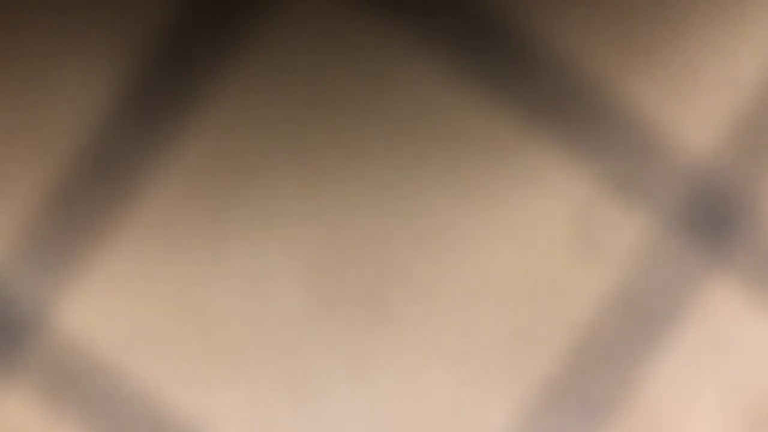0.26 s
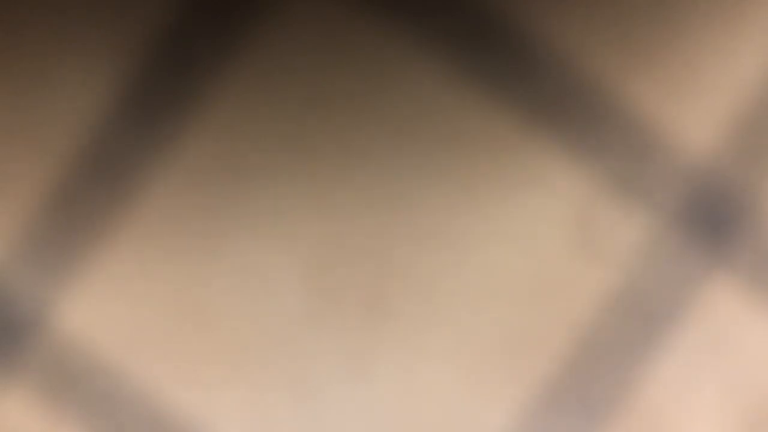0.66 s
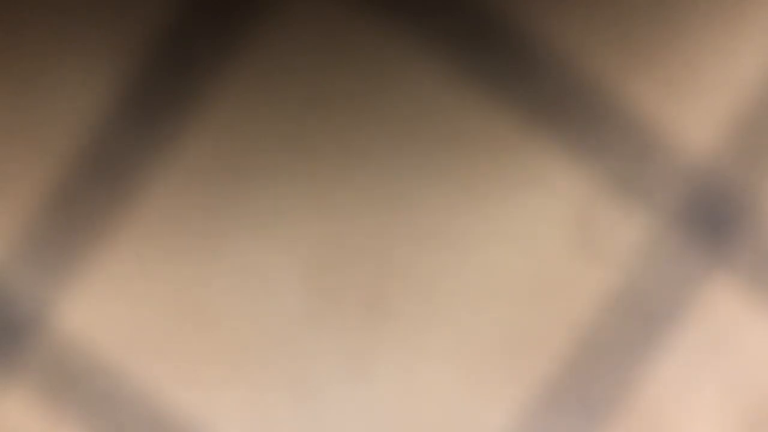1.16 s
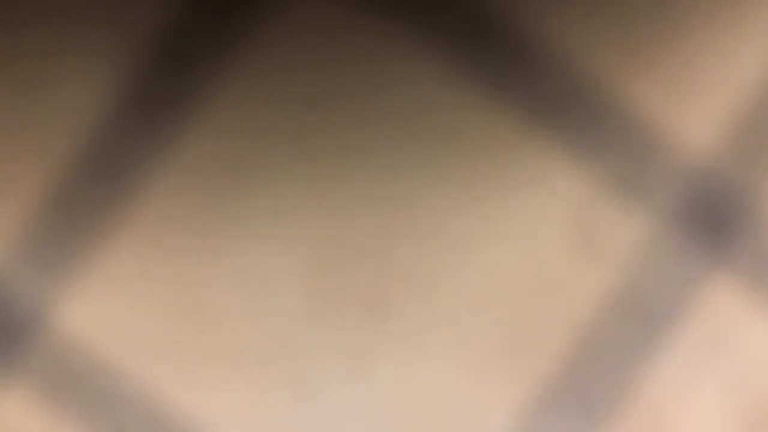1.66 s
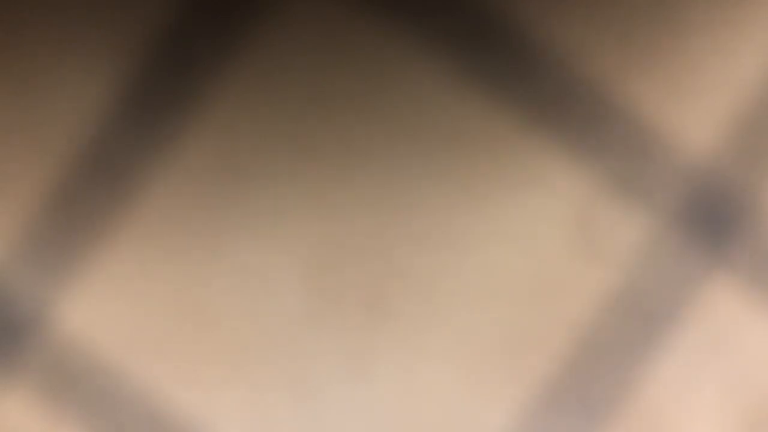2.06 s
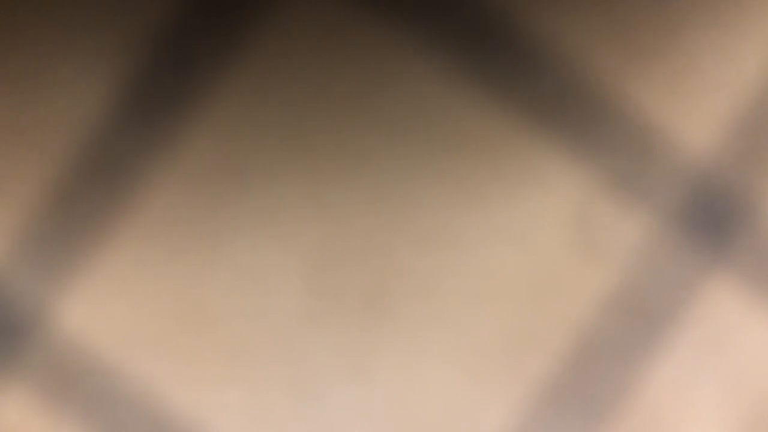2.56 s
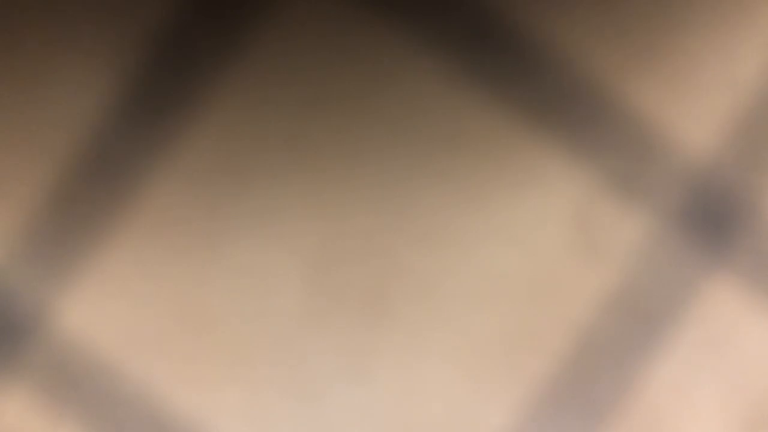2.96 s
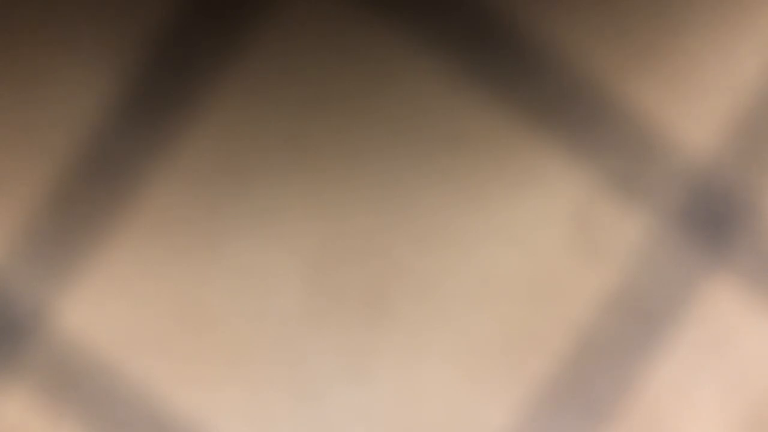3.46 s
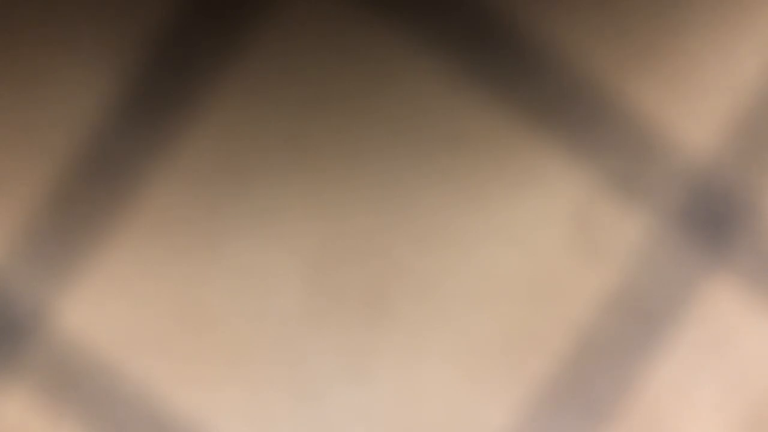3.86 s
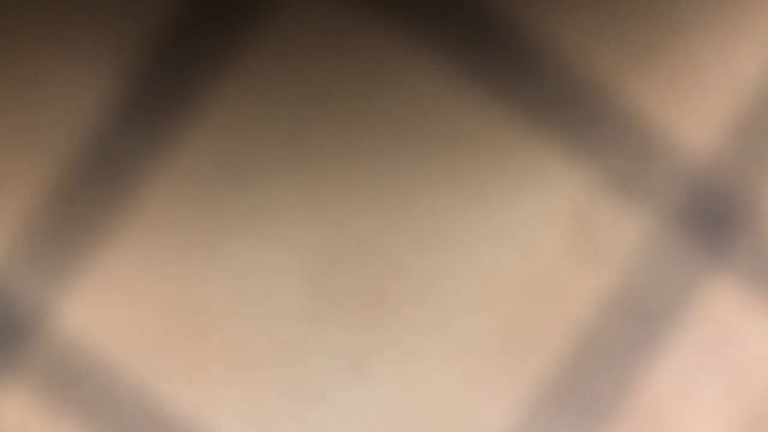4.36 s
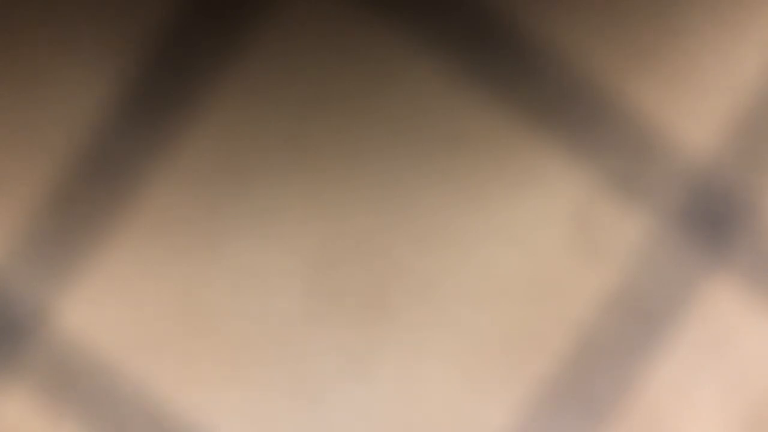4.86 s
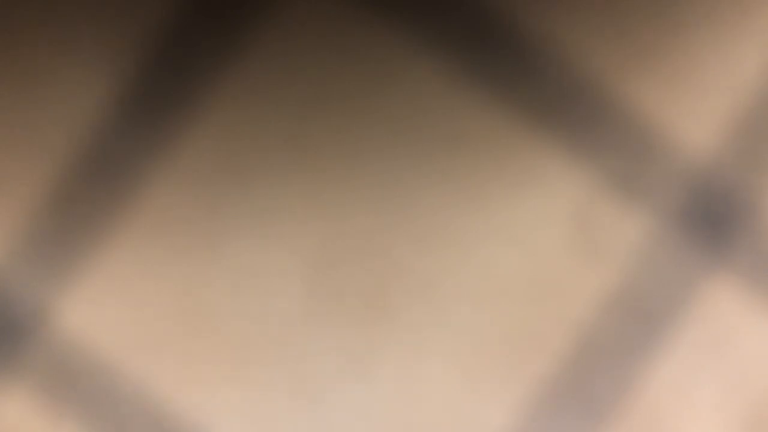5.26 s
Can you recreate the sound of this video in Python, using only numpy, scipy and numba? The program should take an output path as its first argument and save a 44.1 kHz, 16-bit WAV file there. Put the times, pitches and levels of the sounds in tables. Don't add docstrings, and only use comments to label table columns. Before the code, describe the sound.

Close, dry mono pickup in a quiet workshop. Small clicks and a sharp wooden knock lead into a long tearing hand-plane stroke, woody and hissy with thin whistles. A rounder knock ends it; after faint rustling and a medium clack, a second, brighter stroke rips along the wood, then slides off into small scrapes, ticks and shuffles.

```python
import sys
import numpy as np
from scipy import signal
from scipy.fft import rfft, irfft
from scipy.io import wavfile
from scipy.ndimage import uniform_filter1d, map_coordinates
from numba import njit

SR = 44100
rng = np.random.default_rng(int(sys.argv[2]) if len(sys.argv) > 2 else 0)


def gain_from_db(level_db):
    decades = np.asarray(level_db, float) / 20
    return 10 ** decades


def materialize(psi):
    bounded = np.clip(np.atleast_2d(psi).T, -1, 1)
    quanta = np.round(bounded * 32767).astype(np.int16)
    wavfile.write(sys.argv[1], SR, quanta)


N = 243779
T = np.arange(N) / SR

# (pitch [Hz], width [Hz], level [dB])
BENCH_MODES = [(92.9, 26, 5), (52.3, 6.3, -16), (131, 59, -14), (196, 9.3, -19)]
# (pitch [Hz], width [Hz], level [dB])
STRIP_MODES = [(255, 28.4, 4), (382.2, 45, -4), (453.4, 65, -3.5), (585, 40.3, -3.5), (746, 72, 0.5),
               (910, 37, -4), (1066, 72, -3)]
# (pitch [Hz], width [Hz], level [dB])
PLANE_MODES = [(1373, 170, -2.5), (1563, 41, -8), (1720, 170, -0.5), (2070, 160, -7.5), (2400, 305, -2),
               (2720, 190, -5.5), (1200, 200, 0.5), (3194, 540, -10)]
# (frequency [Hz], level [dB per Hz])
SHAVING_COLOUR = [(1710, -39), (2900, -11), (3200, -12.5), (4540, -2), (5230, -4.5), (5930, -10),
                  (6680, -10), (7370, -12.5), (8130, -10.5), (10700, -12.5), (12000, -10.5), (13800, -10.5),
                  (15500, -19)]
# (time [s], downward pressure [dB], bite of the blade [dB], where the strip rings best [Hz])
STROKES = [
    [(.57, -58.5, -65.5, 302), (.74, -59.5, -59, 382), (.886, -43, -44, 370), (1.0, -43.5, -50.5, 460),
     (1.4, -36.5, -39, 416), (1.58, -40, -44, 580), (1.65, -39.5, -50, 428), (1.73, -42, -43.5, 530),
     (2.08, -39.5, -46, 468)],
    [(3.15, -62, -60, 400), (3.29, -49, -51, 454), (3.4, -40, -51.5, 330), (3.55, -38, -44, 715),
     (3.82, -38, -38.5, 454), (4.0, -38.5, -39.5, 740), (4.2, -38, -42, 640), (4.27, -37.5, -40.5, 480),
     (4.37, -47.5, -56, 467)],
]
# (time [s], pressure [dB], bite [dB], strip focus [Hz])
RUN_OUT_PATH = [
    (4.36, -52, -52, 466),
    (4.5, -43.5, -49.5, 450),
    (4.56, -48.5, -57, 410),
    (4.645, -48, -56.5, 240),
]
# (time [s], held [s], level [dB], brightness [dB], strip focus [Hz])
SET_DOWN_SKIDS = [(.05, 0.018, -60, -9.5, 240), (.153, 0.011, -60.5, -8, 380),
                  (0.332, 0.028, -39.5, -22, 327.6), (0.413, 0.044, -43, -9.5, 260),
                  (.46, 0.081, -41, -18, 299), (2.815, 0.035, -68, 10.5, 467),
                  (2.85, 0.024, -51.5, -6.5, 655), (2.891, 0.054, -53, -6.5, 700),
                  (3.034, 0.012, -47, -11, 255), (3.05, .03, -58.5, -11, 260),
                  (2.76, 0.018, -83.5, 10, 502), (5.09, 0.055, -59, -11, 602)]
# (time [s], held [s], level [dB], brightness [dB], strip focus [Hz])
BRUSHING_DRAGS = [(2.029, 0.018, -36.5, -9, 486), (2.1, 0.047, -44.5, -7.5, 395),
                  (2.2, 0.021, -48, -9.5, 333), (2.24, 0.024, -44, -10, 495), (2.4, 0.12, -67.5, -5, 448),
                  (2.555, 0.021, -65, -4.5, 410), (2.62, 0.1, -69, -3.5, 423),
                  (3.09, 0.016, -69, -2.5, 300), (4.66, 0.075, -56.5, -10.5, 280),
                  (4.76, 0.078, -64.5, -0.5, 314), (4.899, 0.048, -54, -1.5, 880),
                  (4.99, 0.045, -65.5, -0.5, 504), (5.091, 0.04, -49.5, -6, 580),
                  (5.17, 0.038, -58, -0.5, 500), (5.24, 0.033, -57.5, 3.5, 700),
                  (5.29, 0.041, -55, -2.5, 810), (5.37, 0.042, -55, -1.5, 317)]
# (bench under strip [dB], hiss over body [dB], top treble [dB], dull rubbing [dB])
CUT_KIND = (-13, -2.5, 0.66, -14.5)
SKID_KIND = (-7.5, -4.5, 4, -9)
DRAG_KIND = (-13, -14.5, -2.5, -7.5)
RUN_OUT_KIND = (-16, -5.5, 5.5, -11.5)
# (middle [s], length [s], level [dB])
BENCH_ROCKS = [(0.904, 0.076, -51), (1.21, 0.23, -38), (1.34, 0.19, -34), (1.463, 0.19, -41.5),
               (1.645, 0.13, -39), (1.757, 0.15, -39.5), (1.999, 0.46, -44), (3.382, 0.16, -43.5),
               (3.69, 0.12, -43), (3.836, 0.25, -38), (4.1, 0.18, -46), (4.22, 0.4, -43.5),
               (4.414, 0.06, -45.5), (4.669, 0.033, -40.5), (5.153, 0.075, -51), (5.4, 0.083, -51.5)]
# (time [s], length [s], from [Hz], to [Hz], level [dB])
SOLE_SQUEAKS = [(1, 0.026, 1590, 1400, -39.5), (1.24, 0.098, 3000, 1700, -39.5),
                (1.462, 0.16, 1014, 1023, -41), (2.029, 0.03, 2500, 2900, -38),
                (3.295, 0.105, 1600, 1318, -42.5), (3.7, 0.038, 2204, 2140, -38),
                (3.79, 0.104, 1900, 1760, -35.5), (3.93, 0.12, 710, 2100, -41.5),
                (4.028, 0.067, 1500, 1700, -43), (5.29, 0.043, 1200, 1000, -52),
                (5.076, 0.091, 1650, 1720, -49.5), (5.088, .045, 1150, 1080, -47),
                (5.095, 0.042, 200, 298, -51), (5.375, 0.0485, 1850, 1400, -56.5),
                (5.36, 0.071, 272, 200, -55.5), (5.25, 0.038, 2000, 2050, -62),
                (.07, 0.024, 1000, 1000, -64), (3.018, 0.034, 2800, 710, -55), (2.93, 0.093, 178, 137, -52),
                (3.8, .06, 200, 122, -53), (.3, 0.024, 1900, 1500, -46), (.456, 0.025, 3000, 2600, -39.5)]
# (time [s], length [s], from [Hz], to [Hz], level [dB])
MOUTH_WHISTLES = [(0.602, 0.43, 13900, 15000, -68), (0.788, .45, 4530, 4110, -49.5),
                  (0.821, 0.3, 8070, 9450, -57), (3.13, 0.15, 8000, 8600, -62),
                  (3.131, 0.12, 10900, 12700, -59), (3.132, .14, 14300, 14700, -62),
                  (3.271, 0.16, 4420, 4510, -51.5), (3.3, 0.35, 13700, 13600, -61),
                  (3.352, 0.23, 8500, 9100, -52), (3.389, 0.27, 5130, 4240, -45.5),
                  (.76, 0.14, 5330, 5650, -58), (0.979, 0.4, 4460, 4200, -46.5),
                  (1.27, .17, 5220, 4700, -47), (1.303, 0.13, 11840, 12200, -52),
                  (1.332, 0.094, 8420, 8700, -54), (1.458, 0.18, 4400, 4160, -50),
                  (1.742, 0.26, 4450, 4830, -51), (1.775, 0.25, 7870, 8700, -54),
                  (1.854, .12, 11800, 11900, -58), (1.748, 0.41, 6100, 6470, -52),
                  (3.616, 0.288, 4480, 4600, -48), (3.66, 0.25, 5290, 5200, -51),
                  (3.977, .2, 4280, 4780, -43), (4.019, 0.11, 6500, 6580, -46.5),
                  (4.02, 0.19, 12550, 11450, -47.5), (4.076, .2, 8640, 8500, -48.5),
                  (4.19, 0.13, 4700, 4900, -44), (4.28, .27, 12800, 12400, -66),
                  (4.3, 0.086, 5970, 5600, -55), (0.732, 0.15, 14900, 15300, -62)]
KNOCK_TIMES = [
    .326,
    .452,
    2.0118,
    2.8352,
    3.033,
]
# (peak [dB], contact [ms], crack [dB])
KNOCK_HITS = [
    (-24.5, 6.5, -30),
    (-2.5, 0.82, -2),
    (-4.5, 2.5, -17.5),
    (-14, 2.5, -11),
    (-34, 4, -17),
]
# (pitch [Hz], level [dB], t60 [s])
SOFT_KNOCK_MODES = [
    [(139.6, -9.5, 0.23), (198, -7.5, 0.17), (248, -1, 0.087), (370, -6, 0.072), (560, -3.5, 0.068),
     (747, -14, .05)],
    [(154, -18.5, 0.19), (273, -7, 0.12), (445, -5, 0.14), (527, -15, 0.14), (700, -12.5, 0.097),
     (786, 3, 0.064), (900, -3.5, 0.092), (1300, -18, 0.067), (1746, -11.5, 0.034), (2580, -29, 0.022)],
    [(150, 2, 0.097), (245, 13, 0.078), (383, -17, 0.078), (613, -22, 0.035), (1200, -5, 0.023),
     (1900, -5, 0.02)],
]
# (pitch [Hz], level [dB], t60 [s])
HARD_KNOCK_MODES = [
    [(249.5, -4, 0.13), (353, 0.5, 0.09), (535, -7, 0.063), (758, -4.5, 0.045), (971, -1.5, 0.061),
     (1070, -6.5, 0.071), (1534, 2.5, 0.035), (1700, -5.5, 0.055), (1900, 4.5, 0.022), (2317, 5, 0.017),
     (2830, -19, 0.018), (3600, -12, .015), (4700, -10, 0.013)],
    [(253.6, -5, 0.091), (360, 3.5, 0.051), (692, -6.5, 0.079), (972, 5.5, 0.051), (1080, -3, 0.077),
     (1500, -23, 0.059), (1670, 2, 0.047), (1810, -6, 0.067), (2340, 1.5, 0.027), (2680, -19, 0.0245)],
]
# (time [s], peak [dB], centre [Hz])
BROAD_SNAPS = [(0.1508, -46, 2260), (.294, -22, 3070), (0.296, -29, 9400), (0.342, -34.5, 1900),
               (0.514, -40, 12500), (2.012, -32, 5000), (.452, -25, 4650), (2.2027, -56, 3000),
               (2.244, -45, 2480), (2.559, -50, 2000), (2.617, -51, 2000), (2.618, -67, 13450),
               (2.638, -57.5, 12570), (2.734, -60.5, 9480), (2.79, -42.5, 9500), (2.815, -54, 3000),
               (2.205, -66, 13000), (2.836, -32, 11900), (2.935, -40, 14000), (2.995, -59, 13950),
               (3.03, -45, 13000), (4.585, -53, 9300), (3.146, -47, 4500), (3.179, -39, 2620),
               (4.702, -46, 2500), (5.188, -49, 1300), (5.293, -40.5, 1200)]
# (time [s], peak [dB], centre [Hz], length
# [ms])
PITCHED_TAPS = [(.013, -56, 4500, 3.9), (.066, -51, 1900, 8), (0.2946, -21, 3830, 3.8), (.295, -26, 4670, 4.5),
                (0.295, -25.5, 2020, 3.8), (0.296, -26, 755, 9.9), (0.4229, -28, 1940, 0.89),
                (.443, -19, 1700, 2), (0.428, -21, 1900, 2), (0.4425, -22, 4450, 2.3),
                (.513, -37.5, 4000, 1.8), (2.638, -44.5, 2060, 1.4), (2.835, -31.5, 3800, 5.6),
                (2.835, -28, 4480, 4.6), (2.856, -35, 1900, 3), (2.876, -44, 1900, 3),
                (3.029, -46.5, 1800, 3.1), (3.269, -45, 8500, 5.9), (4.613, -51, 5650, 6),
                (4.612, -58, 10000, 6), (4.612, -63, 12200, 6), (4.702, -59, 7500, 2), (5.188, -44, 900, 2.8),
                (.154, -51, 800, 4.5), (4.659, -52, 300, 6.7), (4.704, -40, 617, 5.7), (5.092, -41, 900, 11),
                (5.104, -41, 1500, 8), (5.122, -43, 1020, 4), (5.293, -38, 1440, 5), (5.386, -47, 1820, 3),
                (1.093, -36, 170, 13), (1.181, -36, 180, 16), (1.305, -31, 180, 9.1), (1.887, -35, 120, 9.6),
                (4.41, -31, 129.4, 9.4)]
# (frequency [Hz], level [dB per Hz])
AIR_COLOUR = [(15, -36.5), (25, -1.5), (120, 2), (317, -15), (489, -11), (1040, -20), (1840, -24),
              (4140, -26.5), (6210, -35), (13600, -39.5), (16000, -47.5)]

LAND_DB_S, LIFT_DB_S = 410, 303
TOUCH_DB_S, LEAVE_DB_S = 601, 551.5
SAG_DB_S = 130
BRUSH_DB, FADE_DB = 20.5, 18.5
KEEN_START_DB, KEEN_MIDDLE_DB, KEEN_END_DB = 3, -2, 9
KEEN_TURN = 0.7
FILL_DB = -1
CLEAR_S, CLEAR_DB = 3.9, -11
ROCK_HZ, ROCK_DB = 88.8, -1
STROKE_S, FIRST_S, REACH = 2.55, 0.599, 0.2


def planing():
    strip, bench, plane, shaving, keen, rub, focus, rocking = contacts()
    push = fibres(grain_db=1.5, grain_rate=90)

    wood = gain_from_db(ROCK_DB) * rocking * np.sin(2 * np.pi * ROCK_HZ * T)
    bench_ring = resonate(push, BENCH_MODES, 82, focus_db=-2.5, drift_db=0.0, drift_rate=3.6)
    wood += (bench + 0.36 * rocking) * bench_ring
    wood += strip * resonate(push, STRIP_MODES, focus / strip, focus_db=5.0, drift_db=3.0, drift_rate=12)

    body = resonate(push, PLANE_MODES, 1800, focus_db=6.0, drift_db=2.5, drift_rate=13)
    rubbing = unit(svf(svf(push, 3190.0, 1500.0), 3270.0, 2300.0))
    body += rub / plane * rubbing
    wood += plane * mirrors(body, share=0.14, wander_ms=0.3)

    crackling = push * gain_from_db(1.3 * walk(400))
    hiss = mirrors(colour(crackling, SHAVING_COLOUR), share=0.19, wander_ms=0.15)
    bands = []
    for hz in 3000 * 2 ** np.arange(0, 2.45, 0.12):
        favour_db = 2.4 * (3000 / hz) ** 0.22 * np.roll(walk(19), int(hz))
        bands.append(gain_from_db(favour_db) * svf(hiss, hz, 0.12 * hz))
    low, top = sum(bands[:10]), sum(bands[10:])
    return wood + (shaving * low + keen * top) / np.std(low)


def contacts():
    total = contact(0, T[-1], -95 + 0 * T, -100, 300, DRAG_KIND, 0, 0, 0)
    for stroke in STROKES:
        s, *columns = np.transpose(stroke)
        along = np.clip((T - s[0]) / (s[-1] - s[0]), 0, 1) * 2 - 1
        goal_db = np.where(along < 0, KEEN_START_DB, KEEN_END_DB)
        bend = np.minimum(along, 2 * KEEN_TURN - along) ** 2
        keen_db = KEEN_MIDDLE_DB + (goal_db - KEEN_MIDDLE_DB) * bend
        kind = (*CUT_KIND[:3], CUT_KIND[3] + FILL_DB * np.minimum(along, 0.4))
        path = [np.interp(T, s, c) for c in columns]
        total += contact(s[0], s[-1], *path, kind, keen_db, LAND_DB_S, LIFT_DB_S)
    for s, held, db, bright_db, hz in SET_DOWN_SKIDS:
        bite_db = db + bright_db - SAG_DB_S * (np.clip(T - s, 0, held) - held / 2)
        total += contact(s, s + held, db, bite_db, hz, SKID_KIND, 0, TOUCH_DB_S, LEAVE_DB_S)
    for s, held, db, bright_db, hz in BRUSHING_DRAGS:
        total += contact(s, s + held, db, db + bright_db, hz, DRAG_KIND, 0, BRUSH_DB / held, FADE_DB / held)
    s, *columns = np.transpose(RUN_OUT_PATH)
    clear_db = CLEAR_DB * np.clip((T - CLEAR_S) / 0.02, 0, 1)
    path = [np.interp(T, s, c) for c in columns]
    total += contact(s[0], s[-1], *path, RUN_OUT_KIND, clear_db, LAND_DB_S, LEAVE_DB_S)

    rocking = np.zeros(N)
    for middle, length, db in BENCH_ROCKS:
        rocking += gain_from_db(db) * np.cos(np.pi * np.clip((T - middle) / length, -0.5, 0.5)) ** 2
    return (*total, rocking)


def contact(start, end, level_db, bite_db, focus_hz, kind, keen_db, rise_db_s, fall_db_s):
    bench_db, hiss_db, top_db, rub_db = kind
    edge_db = -rise_db_s * np.maximum(start - T, 0) - fall_db_s * np.maximum(T - end, 0)
    strip, body = gain_from_db(level_db + edge_db), gain_from_db(bite_db + edge_db)
    return np.array([strip, strip * gain_from_db(bench_db), body, body * gain_from_db(hiss_db),
                     body * gain_from_db(hiss_db + top_db + keen_db), body * gain_from_db(rub_db), strip * focus_hz])


def fibres(grain_db, grain_rate):
    return rng.standard_normal(N) * gain_from_db(grain_db * np.clip(walk(grain_rate), -1.5, 1.5))


def resonate(push, modes, focus_hz, focus_db, drift_db, drift_rate):
    total, power = np.zeros(N), np.zeros(N)
    for k, (hz, width, db) in enumerate(modes):
        off_focus = np.log2(hz / focus_hz) ** 2
        gain = gain_from_db(db - focus_db * off_focus + drift_db * walk(drift_rate))
        ring = unit(svf(svf(push, 1.0 * hz, 1.38 * width), 1.0 * hz, 2.46 * width))
        total += (-1) ** k * gain * ring
        power += gain ** 2
    return total / np.sqrt(uniform_filter1d(power, SR // 10))


def mirrors(x, share, wander_ms):
    reach = 1 + REACH * np.cos(2 * np.pi * (T - FIRST_S) / STROKE_S)
    echoes = np.zeros(N)
    for path_ms in (0.45, 0.9, 1.7, 2.9, 4.3):
        delay_ms = path_ms * reach + wander_ms * walk(2.99)
        echoes += map_coordinates(x, [np.arange(N) - delay_ms * SR / 1000], order=2)
    return unit(x + share * echoes)


def squeaks():
    out = np.zeros(N)
    rows = [(*row, 0.11 * row[2]) for row in SOLE_SQUEAKS]
    rows += [(*row, 540) for row in MOUTH_WHISTLES]
    for s, length, from_hz, to_hz, db, width_hz in rows:
        n = int(length * SR)
        phase = 2 * np.pi * np.cumsum(np.linspace(from_hz, to_hz, n)) / SR
        rough = uniform_filter1d(rng.standard_normal((2, SR // 2)), int(SR / width_hz), axis=1)[:, :n]
        tone = unit(rough[0] * np.sin(phase) + rough[1] * np.cos(phase))
        out[int(s * SR):][:n] += gain_from_db(db) * np.hanning(n) ** 0.45 * tone
    return out


def knocks():
    out, t = np.zeros(N + SR), T[:SR // 2]
    rings = SOFT_KNOCK_MODES[:1] + HARD_KNOCK_MODES + SOFT_KNOCK_MODES[1:]
    for s, (db, contact_ms, crack_db), modes in zip(KNOCK_TIMES, KNOCK_HITS, rings):
        hz, mode_db, t60 = np.transpose(modes)[:, :, None]
        late = np.maximum(t - 0.57 / hz, 0)
        pair = np.sin(2 * np.pi * hz * late) + 0.34 * np.sin(2 * np.pi * 1.06 * hz * late)
        swell = 1 - np.exp(-late * hz / 0.74)
        ring = np.sum(gain_from_db(mode_db - 60 * late / t60) * swell * pair, axis=0)
        rattle = 0.2 * rng.standard_normal(len(t)) * np.exp(-t * 1000 / contact_ms)
        rattle /= np.sqrt(contact_ms * SR / 2000)
        rattle[0] = 1
        ring = signal.fftconvolve(ring, rattle)[:len(t)]
        crack = rng.standard_normal(len(t)) * np.exp(-t / 0.00065)
        crack = svf(svf(svf(crack, 2000.0, 3000.0), 2000.0, 3000.0), 3100.0, 3500.0)
        hit = ring / np.abs(ring).max() + gain_from_db(crack_db) * crack / np.abs(crack).max()
        out[int(s * SR):][:len(t)] += gain_from_db(db) * hit
    return out[:N]


def ticks():
    out, t = np.zeros(N + SR), T[:SR // 10]
    rows = [(*row, 1.7, 1.3) for row in BROAD_SNAPS]
    rows += [(*row, 17 / np.sqrt(row[2])) for row in PITCHED_TAPS]
    for s, db, hz, ms, share in rows:
        attack = np.minimum(t * 1000 / (0.045 * ms ** 2), 1)
        burst = rng.standard_normal(len(t)) * np.exp(-t * 1000 / ms) * attack
        width = np.clip(share, 0.05, 4) * hz
        burst = svf(svf(burst, 1.0 * hz, width), 1.0 * hz, width)
        out[int(s * SR):][:len(t)] += gain_from_db(db) * burst / np.abs(burst).max()
    return out[:N]


def workshop(x, t60, wet_db):
    t = T[:SR // 2]
    tail = svf(rng.standard_normal(len(t)), 430.0, 1800.0) * gain_from_db(-60 * t / t60) * (t > 0.004)
    tail /= np.sqrt(np.sum(tail ** 2))
    return x + gain_from_db(wet_db) * signal.fftconvolve(x, tail)[:N]


def air():
    motor = unit(svf(svf(rng.standard_normal(N), 135.0, 11.0), 160.0, 30.0))
    hum = gain_from_db(-63 + 3 * np.tanh(walk(4))) * motor
    room_tone = unit(colour(rng.standard_normal(N), AIR_COLOUR))
    return gain_from_db(-60 + 0.9 * walk(3)) * room_tone + hum


def unit(x):
    return x / np.sqrt(np.mean(x ** 2))


@njit
def svf(x, hz, width):
    y, b, l = np.empty(len(x)), 0., 0.
    g, k = np.tan(np.pi * hz / SR), width / hz
    for i in range(len(x)):
        v = (b + g * (x[i] - l)) / (1 + g * (g + k))
        b, l, y[i] = 2 * v - b, l + 2 * g * v, k * v
    return y


def colour(x, points):
    hz, db = np.transpose(points)
    bins = np.maximum(np.arange(len(x) // 2 + 1) * SR / len(x), 1)
    return irfft(rfft(x) * gain_from_db(np.interp(np.log(bins), np.log(hz), db)), len(x))


def walk(rate):
    k = int(SR / rate)
    steps = np.repeat(rng.standard_normal(N // k + 1), k)
    return 1.13 * uniform_filter1d(uniform_filter1d(steps, k), k)[:N]


def scene():
    mono = planing() + squeaks() + workshop(knocks() + ticks(), t60=0.19, wet_db=-19.0) + air()
    return np.array([mono, mono])


def low_pass(x):
    return signal.sosfilt(signal.butter(12, 16450, fs=SR, output="sos"), x)


def record(dry):
    bass = signal.butter(3, 38, "high", fs=SR, output="sos")
    top = signal.ellip(10, 0.2, 70, 15820, fs=SR, output="sos")
    mix = signal.sosfilt(np.vstack([bass, top]), dry)
    return low_pass(mix)


dry = scene()
out = record(dry)
materialize(out)
```